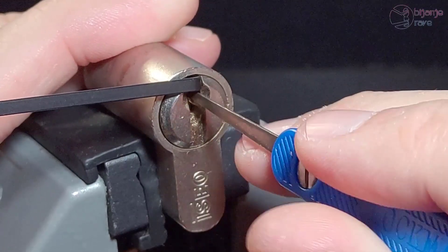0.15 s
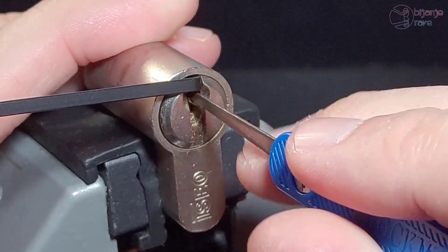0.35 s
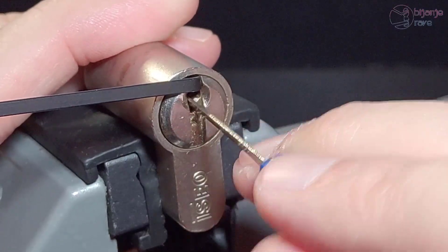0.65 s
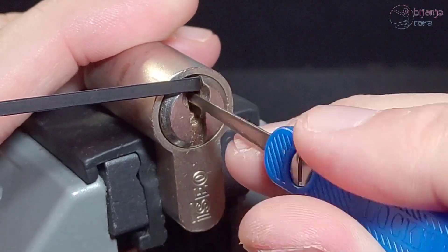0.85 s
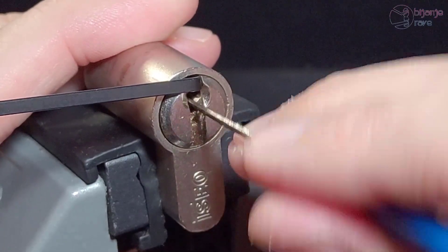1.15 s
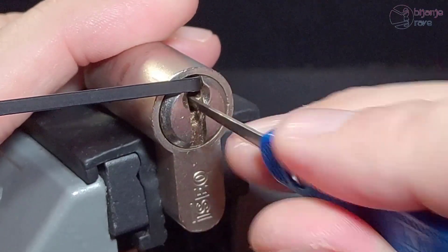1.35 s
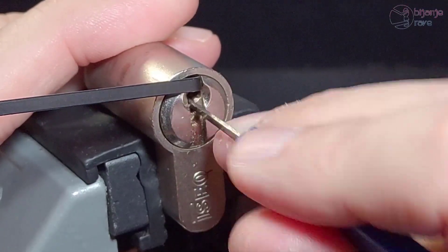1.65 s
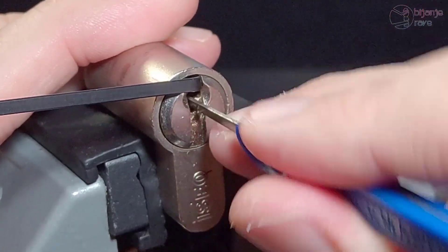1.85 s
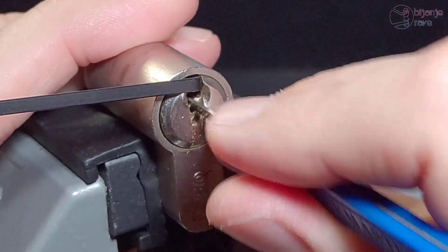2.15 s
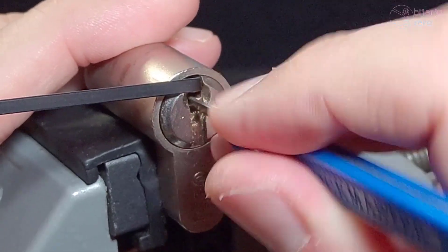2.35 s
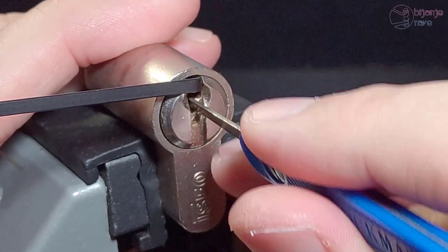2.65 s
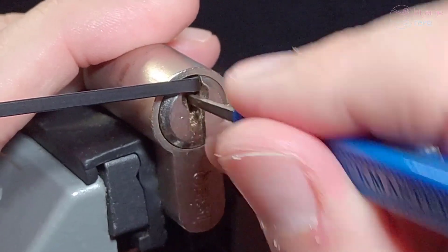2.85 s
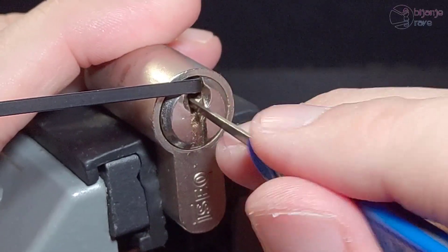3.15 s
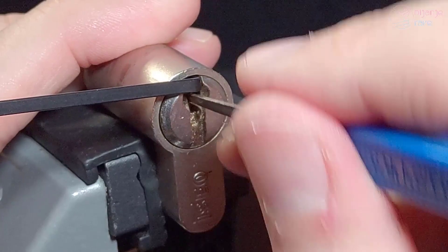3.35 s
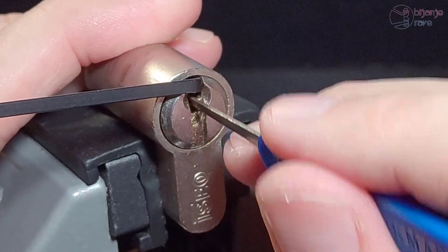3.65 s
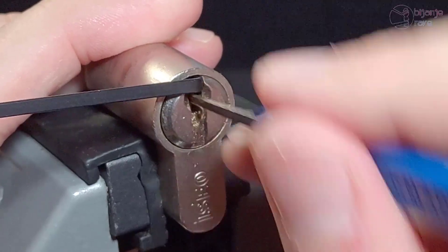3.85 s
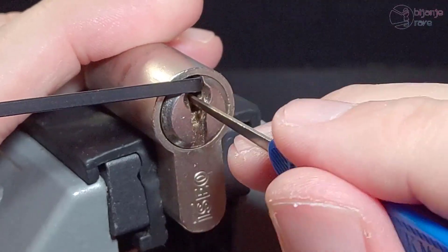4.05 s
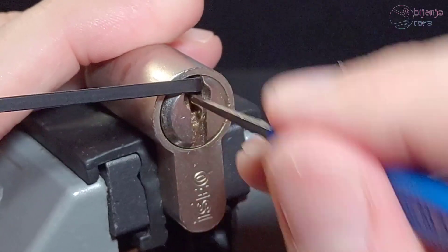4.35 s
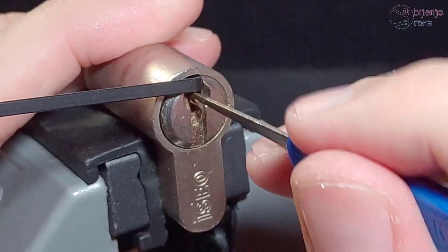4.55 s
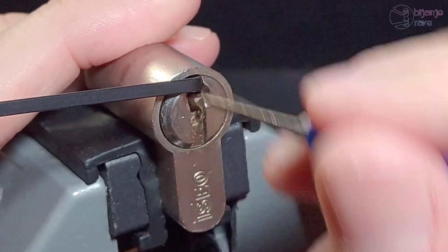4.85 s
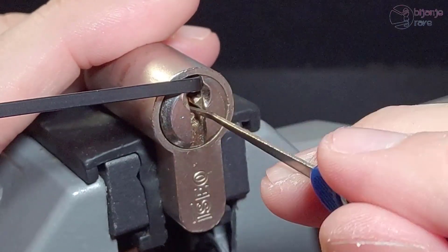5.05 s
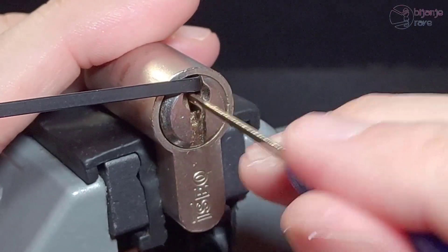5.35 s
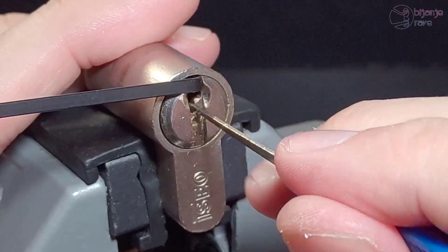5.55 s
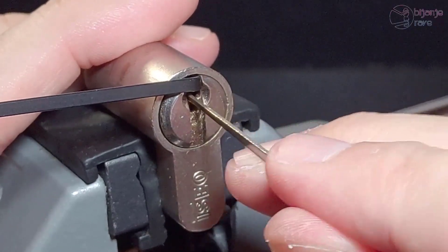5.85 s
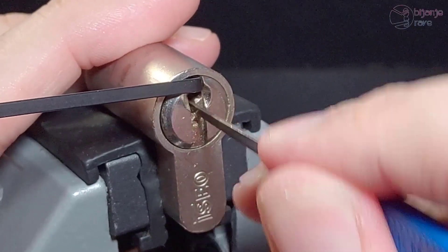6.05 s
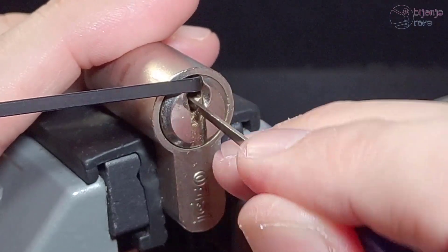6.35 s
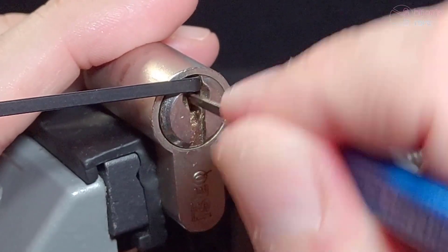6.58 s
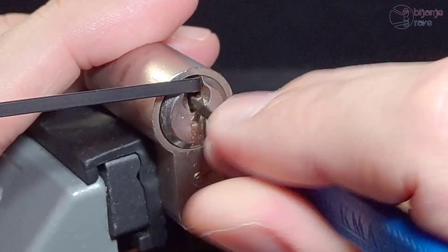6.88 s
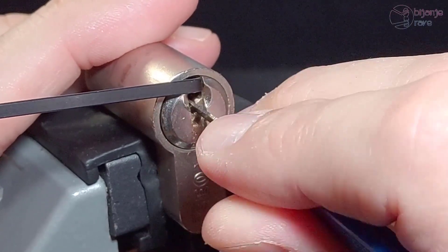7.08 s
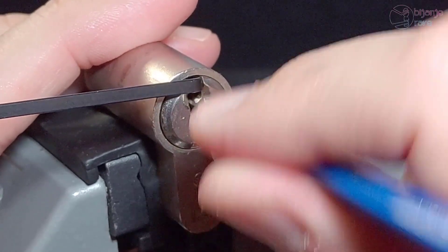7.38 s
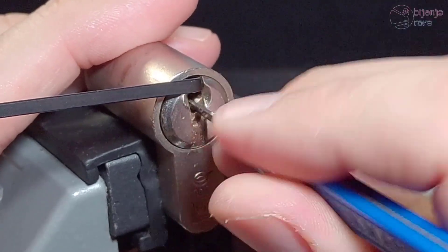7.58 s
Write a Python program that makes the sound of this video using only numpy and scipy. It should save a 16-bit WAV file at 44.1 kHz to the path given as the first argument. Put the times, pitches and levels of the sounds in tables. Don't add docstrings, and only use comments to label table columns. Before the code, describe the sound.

Very close to the microphone in a small quiet room, a pick probes a metal lock cylinder. Faint hand rumble and hiss come first, then tiny ticks and isolated hard bright snaps. The loudest falls halfway, followed by a quick pair and another snap. Light ticking resumes, then a last snap jolts the plastic vise with a hollow knock. Short dense echoes follow, and each click has a faint smear.

```python
import sys
import numpy as np
from scipy import signal
from scipy.fft import rfft, irfft
from scipy.io import wavfile
from scipy.ndimage import uniform_filter1d

SR = 44100
rng = np.random.default_rng(int(sys.argv[2]) if len(sys.argv) > 2 else 0)


def to_linear_factor(level_db):
    exponent = np.asarray(level_db, float) / 20
    return 10 ** exponent


def generate_wav(signal):
    frames = np.transpose(np.atleast_2d(signal))
    scaled = np.clip(frames, -1, 1) * 32767
    pcm = np.round(scaled).astype(np.int16)
    wavfile.write(sys.argv[1], SR, pcm)


N = 340452

# pitch_hz, density_db [dB per Hz]
AIR_SPECTRUM = [(60, -0.5), (102, -2), (174, -6.5), (304, -10.5), (520, -16), (1060, -30), (1470, -27),
                (15200, -37.5)]
# time_s, rumble_db
HAND_PRESSURE = [(0.0, -49), (0.1, -60.5), (0.13, -54), (0.88, -57.5), (1.16, -51), (1.2, -57), (1.27, -51),
                 (1.7, -58), (2.37, -52.5), (2.77, -60.5), (3.18, -57), (4.58, -57.5), (6.26, -50),
                 (6.28, -45.5), (6.43, -56), (7.27, -55), (7.46, -48), (7.72, -60.5)]
# pitch_hz, t60_s
ROOM_DECAY = [(300, 0.39), (1000, 0.11), (3000, 0.19), (6000, 0.13), (10000, 0.16), (15000, 0.077)]
# pitch_hz, level_db
WALL_COLOUR = [(1000, 3.5), (2200, 3), (3700, -3.5), (5000, -2.5), (6500, -1.5), (9000, -6), (12000, -5)]
# start_s, peak_db
THUMPS = [(0.138, -52), (1.009, -62), (1.298, -50.5), (1.791, -52.5), (1.938, -50), (2.251, -60.5),
          (2.318, -50.5), (2.521, -58), (2.822, -47.5), (3.371, -43.5), (3.942, -46.5), (4.326, -58),
          (4.405, -48), (4.507, -52), (4.893, -50), (5.441, -52.5), (5.702, -56), (5.953, -51),
          (6.018, -52), (6.287, -35.5), (6.589, -50), (6.752, -49.5), (6.9, -55.5), (7.245, -83.5),
          (7.449, -47)]
# start_s, peak_db, favoured_mode_hz
KNOCKS = [(0.133, -43, 746), (0.656, -48, 610), (0.85, -48.5, 710), (0.988, -48.5, 560),
          (1.107, -43.5, 760), (1.412, -49.5, 622), (1.789, -47.5, 795), (1.914, -41, 450),
          (2.01, -53.5, 440), (2.255, -46.5, 760), (2.313, -46, 550), (2.439, -46.5, 750),
          (2.514, -46, 766), (3.375, -44.5, 438), (3.998, -39, 447), (4.446, -39.5, 422),
          (4.516, -33.5, 770), (4.524, -28.5, 770), (4.548, -47, 785), (4.575, -46, 776), (4.6, -50, 776),
          (4.9, -39, 446), (4.968, -44.5, 450), (5.635, -53, 270), (5.745, -47, 736), (5.973, -45, 786),
          (6.051, -59, 406), (6.26, -34.5, 850), (6.269, -34, 760), (6.296, -15.5, 820), (6.3053, -23, 780),
          (6.3014, -19, 607), (6.308, -23.5, 447), (6.748, -50, 677),  (7.441, -46, 275)]
# pitch_hz, width_hz, level_db
VISE_MODES = [(230, 90, -15), (310, 70, -14), (447, 40, -6), (558, 50, -7), (622, 50, -5.5), (672, 50, -8),
              (762, 50, -2), (851, 55, -4.5), (930, 80, -10), (1212, 80, -19), (1534, 60, -25),
              (1830, 200, -25)]
# pitch_hz, width_hz, level_db
CYLINDER_MODES = [(1500, 470, -3), (2800, 1200, -5), (3900, 390, -1.5), (4650, 190, -3), (5220, 78, 2),
                  (6500, 270, -0.5), (7200, 230, -3), (7700, 710, -2.5), (8600, 330, -8.5),
                  (10400, 690, -10.5), (11700, 420, -14.5), (13000, 260, -10)]
# pitch_hz, width_hz, level_db
PICK_MODES = [(13700, 370, -41), (14400, 400, -41), (15000, 350, -41), (15400, 250, -39)]
# start_s, length_s, rms_db, centre_hz
SCRAPES = [(.64, .044, -73, 4000), (.86, .026, -76, 5000), (.98, .024, -67, 4040), (1.549, .035, -70, 5000),
           (1.916, .06, -57, 3200), (2.042, .023, -62.5, 1870), (2.338, .029, -66.5, 3120),
           (2.47, .15, -67, 3600), (2.815, .035, -68, 3500), (5.18, .03, -69, 7000),
           (3.358, .063, -68, 2000), (3.946, .028, -59, 4944), (3.993, .022, -36, 3700),
           (4.008, .055, -48, 3500), (4.307, .024, -69, 2500), (4.417, .1, -51, 6500),
           (4.45, .06, -55, 8000), (4.459, .015, -50, 1880), (4.455, .065, -54, 4100),
           (4.895, .052, -48, 3240), (4.903, .04, -58, 1470), (4.93, .013, -58, 6470),
           (5.638, .05, -62, 5500), (5.736, .022, -63, 4920), (5.97, .03, -65, 4970),
           (6.298, .06, -51, 1250), (6.296, .06, -63, 2300), (6.3, .06, -60, 4500), (6.6, .016, -55, 7000),
           (6.738, .038, -66, 6560), (6.861, .06, -73, 6370), (6.885, .025, -68, 2500),
           (7.448, .047, -64, 5870)]
# start_s, peak_db, favoured_ring_hz
TICKS = [(.6594, -49, 3330), (.693, -53, 2630), (.8494, -52, 4650), (.875, -51.5, 5340),
         (.992, -49.5, 3730), (1.2945, -50, 4600), (1.4536, -41.5, 3900), (1.501, -47, 3440),
         (2.017, -48, 7200), (2.4319, -42, 6800), (4.9215, -37.5, 11340), (4.9635, -41, 6480),
         (3.9345, -39.5, 2800), (4.4036, -35, 4570), (5.497, -50, 7700), (5.572, -48, 4950),
         (5.757, -41, 5140), (5.971, -45.5, 4850), (5.984, -47.5, 5100), (6.3448, -35.5, 7800),
         (6.506, -48, 5330), (6.570, -38, 7200), (6.6906, -46.5, 3760), (6.8628, -50, 6800),
         (6.881, -44.5, 7480), (6.895, -47, 6490), (7.515, -50.5, 7300), (7.6245, -42, 6500)]
# start_s, peak_db, favoured_ring_hz
TAPS = [(1.109, -47.5, 2580), (1.429, -47, 3900), (1.556, -47, 7200), (1.7719, -47, 6450),
        (1.79, -47.5, 2480), (2.254, -43.5, 2020), (2.297, -53, 3900), (2.307, -50, 3900),
        (2.315, -41.5, 1980), (2.424, -47.5, 3900), (2.448, -48, 4410), (3.257, -43.5, 8220),
        (4.288, -47.5, 2660), (5.4326, -48.5, 2900), (5.7466, -43, 4380), (6.2605, -37, 6600),
        (6.7603, -49, 7200), (6.936, -48, 7200), (6.9641, -50, 6500), (1.296, -46.5, 1400),
        (1.559, -50, 1403), (3.378, -37.5, 1350), (7.447, -38, 5800)]
# start_s, peak_db, main_hz, second_hz, second_db
NUDGES = [(0.131, -34.5, 9970, 4700, -15), (2.955, -36.5, 3940, 7320, -16), (3.3455, -40, 3850, 7600, -4),
          (3.3745, -28, 4540, 3810, -4), (4.968, -28.5, 6485, 1370, -10.5), (5.613, -37.5, 5000, 3700, -14),
          (5.6204, -37.5, 5030, 7800, -12), (5.6332, -24.5, 5050, 3700, -13),
          (5.636, -30.5, 5220, 4770, -5.5), (6.597, -30, 7430, 6684, -3), (6.603, -30, 7120, 6670, -4),
          (7.44, -31, 3500, 2270, -9.5)]
NUDGE_SHARES = [-25, -15.5, -17, -26, -21.5, -31, -27.5, -27.5, -30, -26, -27, -24]
# start_s, peak_db, first_touch_db, rattle_db, rattle_length_s
SNAPS = [
    (1.911, -3, -20, -13, 0.0035),
    (2.5144, -4.5, -29, -12.5, 0.0035),
    (3.9939, 3, -10.5, -10, 0.003),
    (4.447, -12.5, -15.5, -12, 0.0027),
    (4.515, -2.5, -33, -14.5, 0.0037),
    (4.8987, -6, -20.5, -18.5, 0.0091),
    (6.2951, -5.5, -20, -8.5, 0.0035),
]
# pitch_hz, width_hz, level_db
PIN_1 = [(3250, 350, -14), (3930, 230, -1), (4500, 800, -4), (9600, 300, -20), (6510, 460, 0),
         (6880, 430, -1), (7440, 270, -2), (7870, 540, -1), (8490, 230, -11), (9000, 250, -19),
         (10750, 290, -17), (11370, 280, -13), (11840, 260, -7), (12480, 260, -14)]
PIN_2 = [(2280, 590, -32), (3570, 190, -1), (4300, 190, -12), (6600, 350, -2), (7050, 420, 5),
         (7480, 280, -10), (8130, 300, -15), (8420, 570, -10), (10100, 700, -31), (11200, 900, -36)]
PIN_3 = [(4560, 500, -4), (5290, 300, -2), (6050, 300, -2), (6560, 300, 3), (7080, 300, -1),
         (7490, 260, -1), (8100, 400, -7), (8850, 450, -13), (10160, 400, -14), (11500, 290, -15),
         (12140, 230, -13), (13170, 450, -15), (14000, 500, -14), (15150, 300, -20)]
PIN_4 = [(1990, 280, -23), (2780, 170, -24), (3900, 200, -14), (4570, 250, -8), (5160, 430, -8),
         (6550, 210, 0), (7060, 330, -1), (10230, 300, -15), (14510, 350, -23), (5950, 300, -14),
         (8800, 900, -26), (11800, 2000, -32)]
PIN_5 = [(1220, 180, -23), (3400, 380, -16), (3890, 230, -9), (4630, 220, -18), (5120, 240, -20),
         (5750, 200, -16), (6630, 470, -4), (7180, 310, -5), (7660, 540, -7), (8240, 710, -8),
         (9050, 600, -2), (10000, 600, -8), (13020, 260, -29)]
PIN_6 = [(1470, 250, -13), (1900, 220, -20), (3350, 110, -11), (4610, 230, -2), (5180, 230, -10),
         (6400, 450, -3), (7310, 620, -4), (7580, 700, -3), (7860, 360, -1), (8280, 260, -4),
         (8930, 230, -5), (10010, 230, -8), (11460, 300, -11), (13600, 500, -30)]
PIN_7 = [(1210, 170, -10), (1840, 200, -13), (2860, 230, -19), (4020, 170, -13), (4530, 250, -12),
         (5190, 210, -7), (6500, 700, -2), (7600, 1000, 0), (8750, 500, -1), (10600, 600, -3),
         (9800, 280, -1), (2250, 200, -17), (11700, 600, -14), (13060, 250, -15)]
PIN_MODES = [PIN_1, PIN_2, PIN_3, PIN_4, PIN_5, PIN_6, PIN_7]
SNAP_SHARES = [-36, -44, -32, -31, -30.5, -40, -26]
SNAP_SUDDENNESS = [.7, .45, 0.54, 0.77, .55, .8, .45]
SNAP_LATENESS = [.0009, 0.00012, 0.0013, .0006, .0001, .0009, 0.00036]
SNAP_DIPS = [5800, 5650, 5620, 5600, 6040, 5800, 5600]
SNAP_SHADES = [-2, -3.1, -0.69, 0.31, -0.5, 1, 1.5]
# period_samples, place [0-1], low_hz, high_hz
JOINTS = [
    (700, .855, 350, 7000),
    (567.42, .53, 2500, 16000),
]

LEAD_S = 0.006


def evened(x):
    return x / np.sqrt(np.mean(x ** 2) + 1e-20)


def peaked(x, db):
    return to_linear_factor(db) * x / abs(x).max()


def add(mix, s, sound):
    part = mix[max(round(s * SR), 0):][:len(sound)]
    part += sound[:len(part)]


def coloured(gain):
    hz = np.fft.rfftfreq(N, 1 / SR)
    return evened(irfft(rfft(rng.standard_normal(N)) * gain(hz), N))


def background():
    t = np.arange(N) / SR
    air_hz, air_db = np.transpose(AIR_SPECTRUM)
    hands_db = np.interp(t, *np.transpose(HAND_PRESSURE))
    shoves = sum(to_linear_factor(db) * np.exp(-((t - s) / 0.035) ** 2) for s, db in THUMPS)
    air = coloured(lambda hz: to_linear_factor(np.interp(np.log(hz + 1), np.log(air_hz), air_db)) * (hz < 15400))
    rumble = coloured(lambda hz: hz / (hz + 25) / (1 + (hz / 52) ** 2.8))
    rustle = coloured(lambda hz: hz / (hz + 300) / (1 + (hz / 850) ** 2.14))
    grip = to_linear_factor(2.0 * coloured(lambda hz: hz < 25))
    rumble_gain = to_linear_factor(hands_db + 1.67) + to_linear_factor(-9.5) * shoves
    rustle_gain = to_linear_factor(-68 + 0.24 * (hands_db - hands_db.mean())) + to_linear_factor(-24.5) * shoves
    return to_linear_factor(-56.5) * air + rumble_gain * rumble + rustle_gain * grip * rustle


def room(x, shift_hz):
    hz, t, z = signal.stft(rng.standard_normal((3, SR // 2)), SR, nperseg=128)
    band_hz, t60_s = np.transpose(ROOM_DECAY)
    decay = to_linear_factor(-60 * t / np.interp(hz, band_hz, t60_s)[:, None])
    tails = signal.istft(z * decay, SR, nperseg=128)[1]
    tails *= 1 - np.exp(-np.arange(tails.shape[1]) / SR / 0.00329)
    turns = np.cos(2 * np.pi * (shift_hz * np.arange(N) / SR + np.arange(3)[:, None] / 3))
    echoes = signal.fftconvolve(x * (1 + turns) / 2, tails / np.linalg.norm(tails[0]), axes=1)
    return echoes[:, :N].sum(0)


def thrown(x):
    gain = np.ones(N)
    hz, colour_db = np.transpose(WALL_COLOUR)
    for (s, *_), db in zip(SNAPS, SNAP_SHADES):
        gain[round((s - 0.005) * SR):round((s + 0.02) * SR)] = to_linear_factor(db)
    walls = to_linear_factor(np.interp(np.fft.rfftfreq(N, 1 / SR), hz, colour_db))
    return irfft(rfft(gain * x) * walls, N)


def thumps():
    out, t = np.zeros(N), np.arange(15000) / SR
    swell = to_linear_factor(-60 * t / 0.23) * (1 - np.exp(-t / 0.034))
    for (s, db), load in zip(THUMPS, rng.standard_normal(len(THUMPS))):
        hz = 127.3 * (1 + 0.014 * load)
        add(out, s, peaked(swell * np.sin(2 * np.pi * hz * t), db))
    return out


def ring(modes, seconds, causal=1, late_s=0, dip_hz=0):
    hz, width, db = np.transpose(modes)[:, :, None]
    signed = np.fft.fftfreq(8192, 1 / SR)
    f = abs(signed)
    power = (to_linear_factor(2 * db) / (1 + (2 * (f - hz) / width) ** 2) ** 2).sum(0)
    dip_db = -11.5 * np.exp(-((f - dip_hz) / 395) ** 2) * (dip_hz > 0)
    log_gain = np.log(power * to_linear_factor(2 * dip_db) + 1e-10) / 2
    slow_hz, span_hz = 4000, 1103
    slow = late_s * span_hz * np.tanh((f - slow_hz) / span_hz) + (causal < 1) * LEAD_S * f
    phase = -causal * signal.hilbert(log_gain).imag - 2 * np.pi * np.sign(signed) * slow
    return np.fft.ifft(np.exp(log_gain + 1j * phase)).real[:round(seconds * SR)]


def chatter(count, share):
    return rng.standard_normal((count, 1024)) * (rng.random((count, 1024)) < share)


def rattle(noise, db, length, settle=0.13):
    n = len(noise)
    fade = np.exp(-np.arange(n) / SR / abs(length))
    z = rfft(np.r_[1, to_linear_factor(db) * (noise * fade)[1:]])
    white = irfft(z / abs(z), n)
    return white * fade ** settle * signal.windows.tukey(2 * n, 0.5)[n:]


def knocks():
    out, push = np.zeros(N), np.hanning(14)
    spread = rng.standard_normal((len(KNOCKS), len(VISE_MODES)))
    shuffle = rng.standard_normal((len(KNOCKS), 4096)) * (rng.random((len(KNOCKS), 4096)) < 0.02)
    for (s, db, favoured_hz), chance, noise in zip(KNOCKS, spread, shuffle):
        light = db < -43
        modes = []
        for (hz, width, level_db), c in zip(VISE_MODES, chance):
            favour_db = (8 - 3 * light) * np.exp(-(np.log(hz / favoured_hz) / 0.08) ** 2)
            scuff_db = 11 * light * (hz > 1000)
            modes.append((hz, width * (1.23 + 0.7 * light), level_db + favour_db + 1.5 * c + scuff_db))
        shuffle_db = -0.5 - 0.98 * (db + 42.0)
        blow = np.convolve(push, rattle(noise, shuffle_db, 0.017 - 0.0047 * light, 0.25))
        add(out, s + 0.00042, peaked(signal.fftconvolve(blow, ring(modes, 0.16)), db))
    return out


def scrapes():
    out, shape = np.zeros(N), (len(SCRAPES), 6000)
    slips = to_linear_factor(2.4 * rng.exponential(1, shape)) * (rng.random(shape) < 0.08)
    slips = slips * rng.choice([-1.0, 1.0], shape)
    for (s, length, db, centre_hz), slip in zip(SCRAPES, slips):
        modes = [(hz, 2.0 * width, level_db - 9 * abs(np.log2(hz / centre_hz)))
                 for hz, width, level_db in CYLINDER_MODES]
        modes.append((centre_hz, 500, 5))
        drag = np.convolve(slip[:round(length * SR)], ring(modes, 0.0087), "same")
        add(out, s, to_linear_factor(db) * evened(drag) * signal.windows.tukey(len(drag), 0.5))
    return out


def ticks():
    out = np.zeros(N)
    for rows, tilt_db, slide_s in [(TICKS, 1.55, 0.0034), (TAPS, -4, 0.0045)]:
        spots = 4.0 * rng.standard_normal((len(rows), len(CYLINDER_MODES)))
        for (s, db, favoured_hz), noise, spot in zip(rows, chatter(len(rows), 0.1), spots):
            modes = [(hz, 2.1 * width, level_db + c + tilt_db * np.log2(hz / 5000))
                     for (hz, width, level_db), c in zip(CYLINDER_MODES, spot)]
            modes.append((favoured_hz, 450, 5))
            add(out, s, peaked(np.convolve(rattle(noise, 1.3, slide_s), ring(modes, 0.02)), db))
    return out


def pin_click(out, s, db, touch_db, blow, modes, share_db, causal, late_s, dip_hz=0):
    cylinder = [(hz, 3.5 * width, level_db + share_db + 2 * np.log2(hz / 6000))
                for hz, width, level_db in CYLINDER_MODES]
    tip_db = 1.1 * min(share_db + 32.5, 0)
    tip = [(hz, width, level_db + tip_db) for hz, width, level_db in PICK_MODES]
    body = ring(list(modes) + cylinder + tip, 0.04, np.clip(causal, 0.2, 0.99), late_s, dip_hz)
    click = np.convolve(blow, body)
    rise_s = abs(click[:round(1.25 * LEAD_S * SR)]).argmax() / SR
    add(out, s + 0.0011 - rise_s, peaked(click, db))
    touch_lead_s = 0.0017
    add(out, s + 0.00088 - touch_lead_s - rise_s, peaked(click, db + touch_db))


def nudges():
    out = np.zeros(N)
    width_hz = 300
    for (s, db, hz, second_hz, second_db), share_db, noise in zip(
            NUDGES, NUDGE_SHARES, chatter(len(NUDGES), 0.16)):
        modes = [(hz, width_hz, 0), (second_hz, width_hz, second_db)]
        blow = rattle(noise, -5, 0.0027)
        pin_click(out, s, db, -19, blow, modes, share_db, causal=0.88, late_s=0.00078)
    return out


def snaps():
    out = np.zeros(N)
    for snap, modes, share_db, causal, late_s, dip_hz, noise in zip(
            SNAPS, PIN_MODES, SNAP_SHARES, SNAP_SUDDENNESS, SNAP_LATENESS, SNAP_DIPS,
            chatter(len(SNAPS), 0.1203)):
        s, db, touch_db, rattle_db, length = snap
        blow = rattle(noise, rattle_db, length)
        pin_click(out, s, db, touch_db, blow, modes, share_db, causal, late_s, dip_hz)
    return out


def seams(x, flare):
    out = x.copy()
    for period, place, low_hz, high_hz in JOINTS:
        off_s = ((np.arange(N) / period - place + 0.5) % 1 - 0.5) * period / SR
        sos = signal.butter(1, [low_hz, high_hz], "band", fs=SR, output="sos")
        out += flare * np.exp(-(off_s / 0.0005) ** 2) * signal.sosfiltfilt(sos, x)
    return out


def scene():
    metal = snaps() + nudges() + ticks() + scrapes()
    low = knocks()
    echoes = to_linear_factor(-16.5) * room(thrown(metal), 340) + to_linear_factor(-18.0) * room(low, 60)
    return (metal + low + thumps() + seams(echoes + background(), flare=1.5))[None]


def band_limit(x):
    return signal.sosfilt(signal.butter(12, 16030, fs=SR, output="sos"), x)


def record(dry):
    treble = signal.sosfilt(signal.butter(2, 1500, "high", fs=SR, output="sos"), dry)
    treble = treble / uniform_filter1d(abs(treble) + 1e-4, 300) ** 0.28
    treble = treble * coloured(lambda hz: hz < 450)
    lag = np.arange(-3600, 3601) / SR
    near = to_linear_factor(5 - abs(lag) * 3000)
    far = np.hanning(len(lag)) * to_linear_factor(-abs(lag) * 100)
    smear = rng.standard_normal(len(lag)) * (near + far)
    spread = signal.fftconvolve(treble, smear[None] / np.linalg.norm(smear), "same")
    mix = np.clip(dry + to_linear_factor(-32.5) * seams(spread, flare=0.8), -1, 1)
    return band_limit(mix)


dry = scene()
out = record(dry)
generate_wav(out)
```